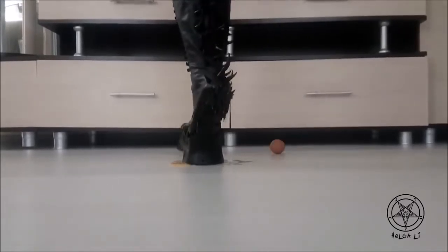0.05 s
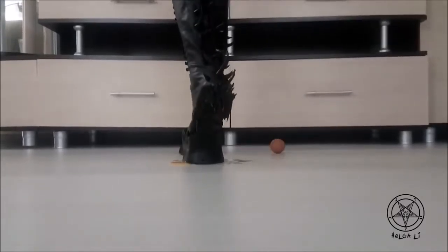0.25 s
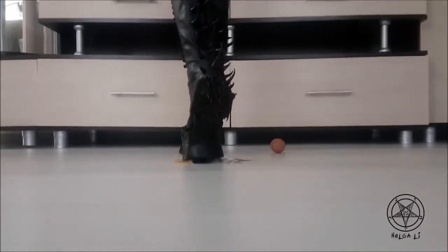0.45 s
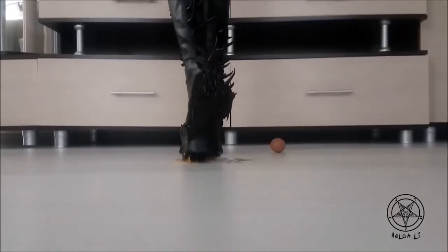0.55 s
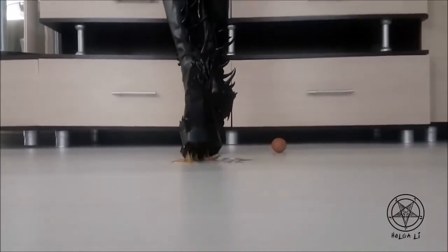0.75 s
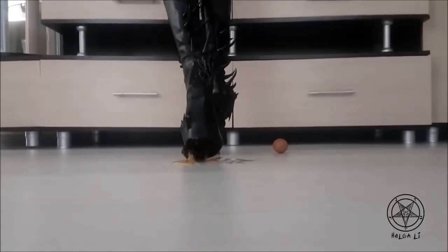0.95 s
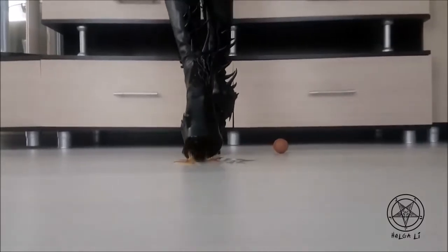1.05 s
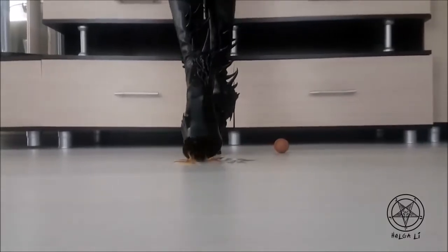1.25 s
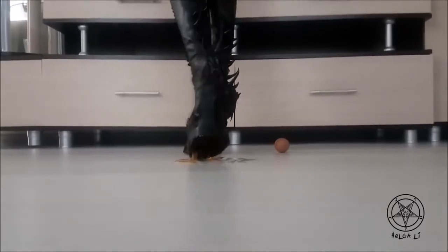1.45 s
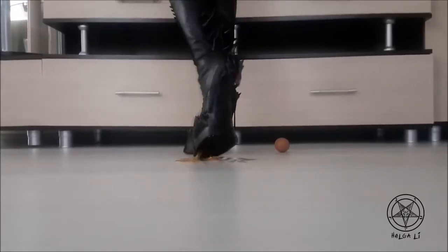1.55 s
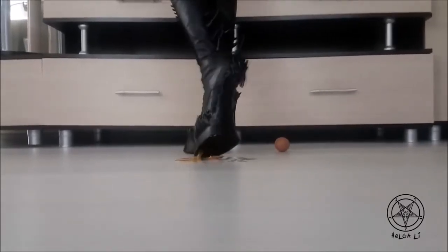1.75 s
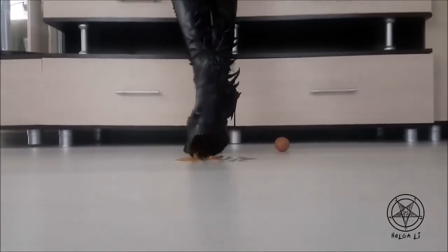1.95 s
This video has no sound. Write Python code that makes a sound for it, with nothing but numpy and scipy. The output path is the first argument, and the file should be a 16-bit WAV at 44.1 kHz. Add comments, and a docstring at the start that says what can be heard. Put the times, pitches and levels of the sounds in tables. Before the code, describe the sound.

An egg crunches under a boot. At 0.2 seconds the hard sole slaps down, and the floor and a cabinet ring briefly. The shell crackles and cracks from about 0.3 to 0.7 seconds. Faint wet squashes and a light sole rub come around 0.9 to 1 second, with soft microphone bumps and low rumble on the right. One more piece snaps near 1.6 seconds, over faint room hiss.

```python
"""A hard boot sole slaps down on a living-room floor and slowly crushes an egg.
The floor and a cabinet ring from the step, and the shell crackles and cracks for half a second.
Under the shifting weight the sole rubs, the wet pieces squash and one more snaps.
Soft bumps and a low rumble reach the right microphone port, over the hiss of the quiet room."""
import sys
import numpy as np
from scipy import signal
from scipy.fft import rfft, irfft
from scipy.io import wavfile

SR = 44100
rng = np.random.default_rng(int(sys.argv[2]) if len(sys.argv) > 2 else 0)


def pcm_store(signal):
    """Save signal as 16-bit PCM."""
    levels = np.round(np.clip(np.atleast_2d(signal), -1, 1) * 32767)
    wavfile.write(sys.argv[1], SR, levels.astype(np.int16).T)


N = 88200
TIME, BIN_HZ = np.arange(N) / SR, np.fft.rfftfreq(N, 1 / SR)


def amp(db):
    """Decibels to gain."""
    return 10 ** (np.asarray(db) / 20)


def unit(x):
    """Scales to rms 1."""
    return x / np.sqrt(np.mean(x ** 2) + 1e-20)


def read(points, hz):
    """Reads a curve on a log-frequency axis."""
    point_hz, value = np.transpose(points)
    return np.interp(np.log(hz + 1), np.log(point_hz + 1), value)


def fader(points):
    """Gain over time from (seconds, dB) points."""
    return amp(np.interp(TIME, *np.transpose(points)))


def pan(db):
    """Left and right gains; positive dB leans left."""
    return amp(np.array([[1], [-1]]) * db / 2)


def click(at_s):
    """A unit impulse."""
    return 1. * (np.arange(N) == round(at_s * SR))


def pulse(middle_s, half_s):
    """A bell-shaped swell that peaks at 1."""
    return np.exp(-((TIME - middle_s) / half_s) ** 2)


def convolve(x, response):
    """Convolves each channel, cut to the scene's length."""
    return signal.fftconvolve(np.atleast_2d(x), np.atleast_2d(response), axes=1)[:, :N]


def colour(x, curve):
    """Minimum-phase EQ of unit energy: the curve sets only the tone."""
    log_gain = np.log(amp(read(curve, abs(np.fft.fftfreq(32768, 1 / SR)))))
    spectrum = np.exp(np.conj(signal.hilbert(log_gain)))
    taps = np.fft.ifft(spectrum).real[:16384]
    return convolve(x, taps / np.linalg.norm(taps))


def ring(modes):
    """Dying sines from (Hz, dB, seconds to fall 60 dB) rows."""
    return sum(amp(db - 60 * TIME / t60) * np.sin(2 * np.pi * hz * TIME) for hz, db, t60 in modes)


def crackle(per_s, spread_db):
    """Random ticks of uneven size, scattered between left and right."""
    size = amp(spread_db * np.minimum(rng.exponential(1, N), 4))
    fires = rng.random(N) < per_s / SR
    ticks = size * fires * rng.choice([-1, 1], N)
    return unit(ticks * (1 + 0.74 * rng.standard_normal((2, N))))


# Stereo width of the room. Each row: frequency in Hz, left-right correlation.
ROOM_LIKENESS = [(60, 0.74), (500, 0.98), (1000, 0.36), (3000, 0.21), (12000, 0.033)]
def diffuse():
    """Noise from all around: narrow in the lows, wide in the highs."""
    left, other = rfft(rng.standard_normal((2, N)))
    likeness = np.clip(read(ROOM_LIKENESS, BIN_HZ), -1, 1)
    right = likeness * left + np.sqrt(1 - likeness ** 2) * other
    return irfft(np.array([left, right]), N)


def tail(decay, hold_s):
    """Diffuse sound that holds, then dies at its own speed in each band."""
    hz, t, bands = signal.stft(diffuse(), SR, nperseg=256)
    fade = amp(-60 * np.maximum(t - hold_s, 0) / read(decay, hz)[:, None])
    attack = 1 - np.exp(-TIME / 0.00071)
    return signal.istft(bands * fade, SR)[1][:, :N] * attack


# Living-room reverb. Each row: frequency in Hz, seconds to fall 60 dB.
ROOM_DECAY = [(200, 0.66), (1000, .42), (2600, 0.39), (7000, 0.28), (14000, 0.37)]
def room(x, wet_db):
    """Direct sound plus the room's reverb."""
    response = tail(ROOM_DECAY, hold_s=0.014)
    return x + amp(wet_db) * convolve(x, response / np.linalg.norm(response[0]))


# Tone of the rumble. Each row: frequency in Hz, relative level in dB.
RUMBLE_EQ = [(3, -19.5), (11, 2), (20, -14.5), (35, -20), (70, -21), (130, -41), (300, -50), (600, -61.5),
             (2000, -110)]
# Its slow swells. Each row: time in seconds, level on the right in dB.
RUMBLE_FADER = [(0, -44), (0.2, -42.5), (0.35, -36), (0.43, -44), (0.58, -44), (0.67, -43), (0.77, -43.5),
                (0.95, -28), (1.08, -32), (1.19, -36.5), (1.3, -34), (1.46, -40.5), (1.62, -33),
                (1.8, -44.5), (2, -41.5)]
def rumble():
    """A deep, swaying rumble, nearly all in the right port."""
    lows = unit(colour(rng.standard_normal((2, N)), RUMBLE_EQ))
    return lows * fader(RUMBLE_FADER) * np.array([[amp(-29.5)], [1]])


# Tone of the quiet room. Each row: frequency in Hz, relative level in dB.
ROOM_TONE_EQ = [(59, -11.5), (100, -5.5), (407, -18.5), (718, -23), (885, -20), (983, -28), (1370, -26),
                (4540, -31), (15000, -40)]
def room_tone():
    """A faint, steady bed of diffuse hiss."""
    return amp(-67.5) * unit(colour(diffuse(), ROOM_TONE_EQ))


# Modes of the high ring that the cracks set off. Each row: pitch in Hz, relative level in dB, seconds to fall
# 60 dB.
HIGH_RING_MODES = [(5270, -3, 0.013), (5474, 3.5, 0.019), (6650, -7, 0.0093)]
def high_ping(detune):
    """A brief high ring near 5.4 kHz, detuned by a fraction of its pitch."""
    modes = [(hz * (1 + detune), db, t60) for hz, db, t60 in HIGH_RING_MODES]
    attack = 1 - np.exp(-TIME / 0.00066)
    return (amp(-18.5) * ring(modes) * attack)[:2048]


# Crackle as the sole bears down. Each row: time in seconds, relative level in dB.
CRUSH_FADER = [(0.0, -77), (0.215, -76.5), (0.224, -56), (0.28, -53), (0.338, -58.5), (0.365, -43),
               (0.415, -52), (0.48, -43), (0.545, -46.5), (0.60, -46.5), (0.65, -46), (0.695, -42),
               (0.73, -51), (0.78, -65.5), (0.87, -67), (1.04, -69), (1.12, -85.5), (2.0, -75)]
# The bigger cracks. Each row: start in seconds, relative level in dB, left over right in dB.
SHELL_FRACTURES = [(0.0937, -26, 2), (0.2190, -11, -8), (0.2246, -6.5, -14), (0.3577, -8, -12),
                   (0.3655, -5.5, 8), (0.37, -0.5, -9.5), (0.3762, -2.5, -16.5), (0.392, -9.5, 20.5),
                   (0.4322, -3, -2), (0.4592, -10, -3), (0.4794, -4, -11), (0.487, -4, -8),
                   (0.5096, -5.5, -2), (0.5704, 0, -2.5), (0.5783, -3, -6), (0.6000, -1.5, -4.5),
                   (0.6168, -7, -12), (0.6226, 0, -9), (0.6609, -6, 0), (0.6682, -3.5, 3),
                   (0.6801, -5.5, -17.5), (0.688, -3, 7), (0.694, -8.5, 11), (1.169, -36.5, -12),
                   (1.5627, -11, -6), (1.7549, -29.5, -3), (1.7865, -32, -1), (1.957, -33, 5)]
# Tone of the crunch. Each row: frequency in Hz, relative level in dB.
CRUNCH_EQ = [(100, -8.5), (400, -5), (900, -9), (1190, -2), (1400, -11.5), (2000, -8), (2700, -4.5),
             (4200, -3), (5400, 4.5), (6700, 2), (8200, -10), (11500, -18.5), (13500, -15.5), (15500, -41)]
# Where each band of the crunch sits. Each row: frequency in Hz, left over right in dB.
CRUNCH_PAN = [(300, -1.5), (4000, 1.5), (5400, -4.5), (6700, 3), (9000, 11), (13000, 5)]
def eggshell():
    """The shell gives way in fine crackle and larger fractures that crumble; the cracks set off a brief high
    ring near 5.4 kHz."""
    crush = amp(-5.5) * fader(CRUSH_FADER)
    fine_breaks = crush * crackle(per_s=2000, spread_db=0)
    ringing_breaks = crush * crackle(per_s=2100, spread_db=0.5) * pan(db=-11)
    fractures = [amp(db - 11.5) * pan(side) * click(s) for s, db, side in SHELL_FRACTURES]
    crumbling = convolve(sum(fractures), np.exp(-TIME / 0.0049))
    crumbs = amp(-32) * crumbling * crackle(per_s=6000, spread_db=4.0)
    pings = convolve(ringing_breaks, high_ping(detune=0))
    for piece in range(4):  # the fractures take turns on four slightly different pitches
        ping = high_ping(detune=0.013 * rng.standard_normal())
        pings = pings + convolve(sum(fractures[piece::4]), ping)
    crunch = room(colour(fine_breaks + crumbs, CRUNCH_EQ), wet_db=1.5)
    crunch = irfft(rfft(crunch) * pan(read(CRUNCH_PAN, BIN_HZ)), N)
    return crunch + room(pings, wet_db=-9.5)


# Presses on the wet pieces. Each row: start in seconds, level before the room in dB, fade in seconds.
SQUASH_CUES = [(0.093, -64.5, 0.05), (0.87, -59, 0.035), (0.906, -54, 0.021), (0.989, -53.5, 0.029),
               (1.172, -66, 0.018), (1.532, -69.5, 0.033), (1.839, -73.5, 0.035)]
# Tone of a squash. Each row: frequency in Hz, relative level in dB.
SQUASH_EQ = [(150, 10.5), (500, 4.5), (1500, -3.5), (2400, 1), (3000, 0.5), (4200, -4), (5500, 1),
             (7200, -8.5), (8500, -15), (15000, -24)]
def squashes():
    """Short gritty bursts as the weight shifts on the wet pieces."""
    pressure = sum(amp(db) * (TIME > s) * pulse(s, fade_s) for s, db, fade_s in SQUASH_CUES)
    grit = pressure * crackle(per_s=2500, spread_db=2.0)
    return room(colour(grit, SQUASH_EQ), wet_db=2)


# Soft bumps. Each row: peak time in seconds, relative level in dB, half the contact in seconds.
BUMP_CUES = [(0.162, -26.5, .003), (0.63, -19, 0.002), (0.695, -19, 0.0022), (0.791, -13, 0.0026),
             (0.8083, -13.5, 0.0012), (0.8291, -14.5, .0011), (0.8799, -16, 0.00098),
             (0.9208, -16.5, 0.0014), (1.0382, -8, 0.0017), (1.3206, -28, 0.00068), (1.613, -25, .0005)]
# Tone of a bump. Each row: frequency in Hz, relative level in dB.
BUMP_EQ = [(20, -22.5), (70, 2.5), (130, -1), (220, -3.5), (300, -4), (420, 3.5), (490, -11.5), (620, -36),
           (2000, -70)]
def port_bumps():
    """Dull knocks, nearly all in the right port; a longer contact sounds deeper."""
    pushes = sum(amp(db) * pulse(s, half_s) / (half_s * SR * np.sqrt(np.pi))  # level sets the area
                 for s, db, half_s in BUMP_CUES)
    return amp(10.5) * colour(pushes, BUMP_EQ) * np.array([[amp(-24.5)], [1]])


# The sole lands. Each row: peak time in seconds, relative level in dB, half the contact in seconds.
SOLE_HITS = [(0.2213, -18.5, 0.0002), (0.2250, -44, .0005), (0.26, -28, 0.00072)]
# Floor and cabinet. Each row: pitch in Hz, relative level in dB, seconds to fall 60 dB.
FLOOR_AND_CABINET = [(66.1, -7, 0.464), (190, 4, 0.23), (214, 2, 0.2), (328, -19, .26), (398, -10.5, 0.36),
                     (525, -15, 0.17), (601, -17, 0.36), (677, -7, 0.19), (766, -14.5, 0.38),
                     (830, -18, 0.54), (978, -26, 0.33), (1110, -12, 0.14), (1553, -15, 0.19),
                     (1690, -19.5, 0.42)]
# Tone of the room's boom. Each row: frequency in Hz, relative level in dB.
BOOM_EQ = [(50, -7), (110, -4.5), (205, 2.5), (330, -4.5), (700, -7.5), (1200, -15.5), (1750, -16.5),
           (2600, -22), (3700, -38.5), (4700, -40), (5500, -27.5), (7000, -36), (9000, -48), (14000, -71)]
# Length of the boom. Each row: frequency in Hz, seconds to fall 60 dB.
BOOM_DECAY = [(100, 0.43), (260, 0.23), (700, 0.24), (1800, 0.39), (5000, 0.52), (12000, 0.53)]
def sole_slap():
    """The sole slaps down; its first hit sets floor, cabinet and room ringing."""
    slap = sum(amp(db) * pulse(s, half_s) for s, db, half_s in SOLE_HITS)
    body = amp(-30) * ring(FLOOR_AND_CABINET) * (1 - np.exp(-TIME / 0.005))
    boom = amp(-32) * colour(tail(BOOM_DECAY, hold_s=0.028), BOOM_EQ)
    first_hit = click(SOLE_HITS[0][0])
    return pan(db=-3.5) * (slap + convolve(first_hit, body + boom))


# Sole rubs. Each row: middle in seconds, half length in seconds, pitch in Hz, level before the room in dB.
RUB_CUES = [(0.641, 0.056, 1180, -57.5), (0.999, 0.015, 3025, -56.5)]
def sole_rubs():
    """Tiny slips of the sole on the floor excite one damped resonance in each rub."""
    rubs, t60_s = 0, 0.019
    for s, half_s, hz, db in RUB_CUES:
        slips = crackle(per_s=1500, spread_db=-0.5)
        scuff = unit(convolve(slips, ring([(hz, 0, t60_s)])))
        rubs = rubs + amp(db) * pulse(s, half_s) * scuff
    return room(rubs, wet_db=-6)


# Quick stages of the last snap. Each row: start in seconds, relative level in dB.
SNAP_STAGES = [(1.5640, -39), (1.5654, -20.5), (1.5674, -37)]
# Tone of the snap. Each row: frequency in Hz, relative level in dB.
SNAP_EQ = [(300, -8), (1400, -8), (2200, 3), (2900, 3.5), (3900, -4), (5200, 6.5), (6200, 3.5), (7400, 5),
           (8300, -15), (10300, -9.5), (15000, -25)]
def last_snap():
    """One more piece of shell gives way as the heel lifts."""
    clicks = sum(amp(db) * click(s) for s, db in SNAP_STAGES)
    return room(colour(clicks, SNAP_EQ), wet_db=2)


def scene():
    """The step and the breaking egg up front, over bumps, rumble and room tone."""
    boot_on_egg = sole_slap() + eggshell() + sole_rubs() + squashes() + last_snap()
    return boot_on_egg + port_bumps() + rumble() + room_tone()


def record(dry):
    """A steep high cut takes off the very top."""
    cutoff_hz = 15400
    high_cut = signal.firwin(401, cutoff_hz, window=("kaiser", 9), fs=SR)
    return signal.oaconvolve(dry, high_cut[None], "same")


dry = scene()
out = record(dry)
pcm_store(out)
```